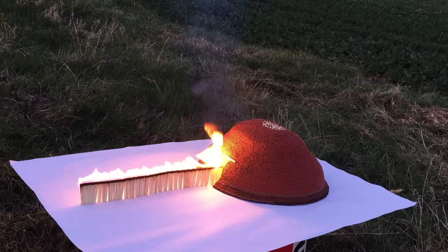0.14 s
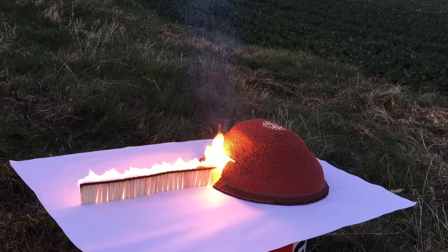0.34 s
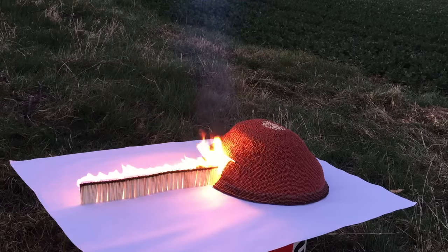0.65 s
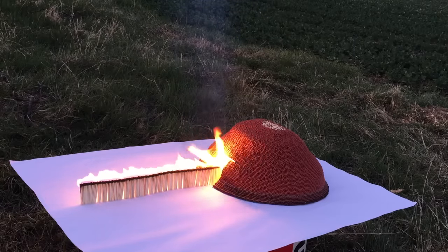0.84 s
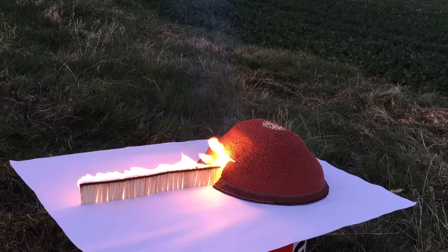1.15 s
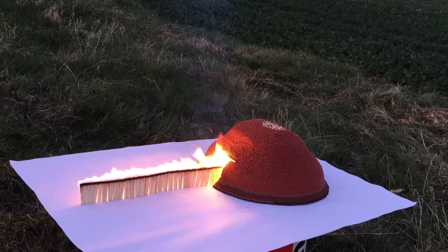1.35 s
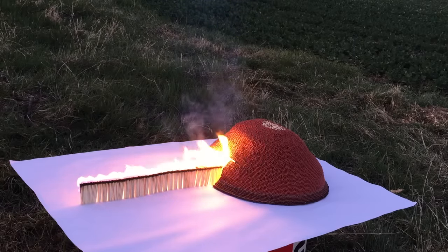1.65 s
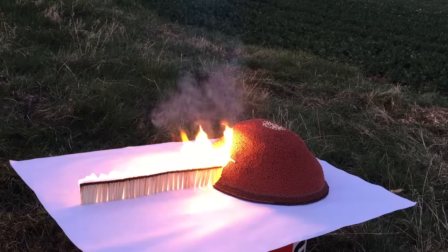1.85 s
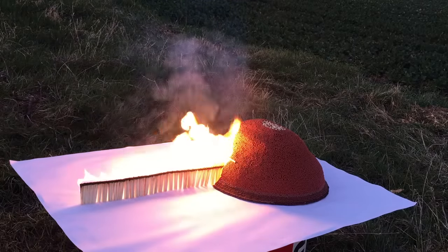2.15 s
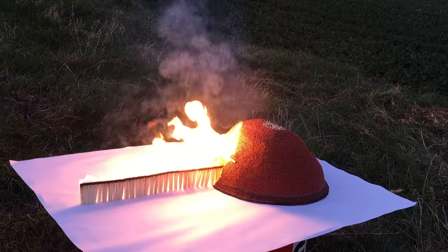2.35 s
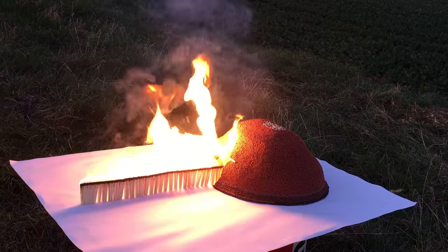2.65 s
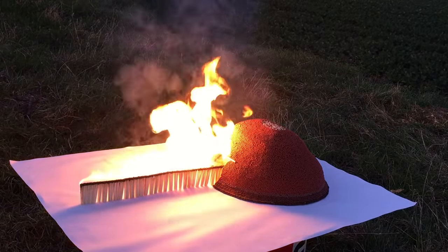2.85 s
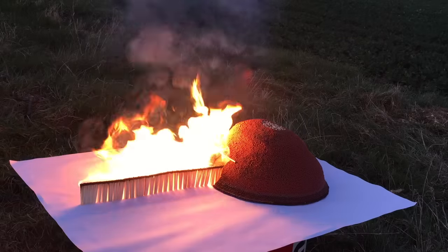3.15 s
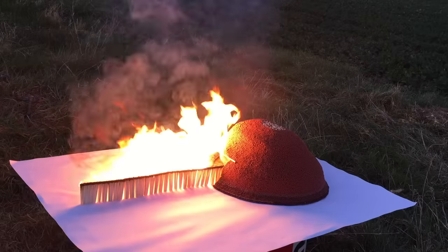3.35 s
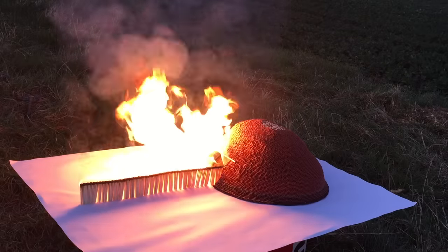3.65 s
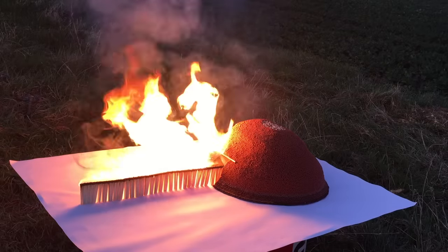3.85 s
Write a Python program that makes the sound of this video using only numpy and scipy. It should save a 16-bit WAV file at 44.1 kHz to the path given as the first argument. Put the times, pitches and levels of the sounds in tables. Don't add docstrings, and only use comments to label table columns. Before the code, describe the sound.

Fire crackles faintly, then flares into a fluttering, hissing roar with sharp pops as matches ignite

```python
import sys
import numpy as np
from scipy import signal
from scipy.fft import rfft, irfft
from scipy.io import wavfile
from scipy.ndimage import uniform_filter1d, map_coordinates

SR = 44100
rng = np.random.default_rng(int(sys.argv[2]) if len(sys.argv) > 2 else 0)


def magnitude_from_level(level_db):
    exponent = np.asarray(level_db, float) / 20
    return 10 ** exponent


def materialize(psi):
    bounded = np.clip(np.atleast_2d(psi).T, -1, 1)
    quanta = np.round(bounded * 32767).astype(np.int16)
    wavfile.write(sys.argv[1], SR, quanta)


N = 176400

# f/Hz, level/dB per Hz
SMALL_FLAME_COLOUR = [(120, -41), (250, -16.5), (650, -6.5), (1950, 1), (3300, -7), (3900, -28),
                      (4800, -40), (7000, -15)]


def unit(x):
    return x / np.sqrt(np.mean(x ** 2) + 1e-20)


def curves(rows):
    s, *cols = np.transpose(rows)
    return [np.interp(np.arange(N) / SR, s, c) for c in cols]


def wobble(rate):
    knots = rng.standard_normal(int(N * 60 / SR) + 9)
    return map_coordinates(knots, [np.arange(N) * min(rate, 60) / SR])


def rush(spectrum, patchy_db):
    z = signal.stft(rng.standard_normal(N), nperseg=512)[2]
    patches = uniform_filter1d(rng.standard_normal(z.shape), size=7, axis=0)
    patches = uniform_filter1d(patches, size=7, axis=1)
    x = signal.istft(z * magnitude_from_level(patchy_db * unit(patches)), nperseg=512)[1][:N]
    f, db = np.transpose([(spectrum[0][0] / 2, -90), *spectrum, (spectrum[-1][0] * 1.3, -90)])
    hz = np.fft.rfftfreq(N, 1 / SR)
    colour = magnitude_from_level(np.interp(np.log(hz + 1), np.log(f + 1), db))
    return unit(irfft(rfft(x) * colour, N))


def add(track, s, piece):
    i = max(round(s * SR), 0)
    track[i:i + len(piece)] += piece[:len(track) - i]


def wavelet(t, hz, cycles, sag=0):
    bend = sag / cycles ** 2 + 1e-3
    turns = (1 - np.exp(-bend * np.clip(hz * t, -4, 9))) / bend
    envelope = np.exp(-(turns / (.6 * cycles)) ** 4 - (hz * t / (1.1 * cycles)) ** 2)
    return envelope * np.cos(2 * np.pi * turns + .2)


def field():
    # f/Hz, level/dB per Hz
    air_colour = [(18, -22), (30, -10), (59, -23), (88, -8), (124, -7), (364, -17.5), (600, -12.5),
                  (913, -18.5), (16000, -47)]
    # t/s, firing f/Hz, level/dB
    engine_drone = [(0, 56.5, -58), (.06, 56.2, -56.5), (.29, 54, -54), (.35, 55, -69), (.44, 56.4, -56),
                    (.52, 56.4, -70), (.62, 54.8, -60), (1.04, 54.8, -57), (1.4, 54.3, -65),
                    (1.55, 53, -69), (2.2, 54.7, -78)]
    t = np.arange(N) / SR
    hz, db = curves(engine_drone)
    throb_db = 2.5 * np.sin(2 * np.pi * 12 * t)
    level = magnitude_from_level(db + 2 * wobble(17) + throb_db) * np.sqrt(2)
    drone = level * np.sin(2 * np.pi * np.cumsum(hz + 3 * wobble(12)) / SR)
    hum_hz = 113.3 + 9 * wobble(14)
    hum = magnitude_from_level(-68 + 4 * wobble(15)) * np.sin(2 * np.pi * np.cumsum(hum_hz) / SR)
    return magnitude_from_level(-60) * rush(air_colour, patchy_db=2.2) + drone + hum


def pops():
    # t/s, peak level/dB, crack f/Hz,
    # length/cycles, thump over the crack/dB
    gas_pockets = [(0.029, -42.5, 1820, 9.3, 7), (0.083, -43, 1480, 6.1, -27), (.640, -40.5, 1620, 1.5, -3),
                   (.663, -37.5, 1610, 1.2, -15), (.7946, -28.5, 2470, 2.16, -27),
                   (1.2936, -32, 1910, 0.94, -7), (1.7588, -30.5, 1696, 1.35, -36),
                   (1.9317, -30.5, 1150, 1.8, -1), (1.981, -29.5, 1730, 1.7, -38),
                   (2.1852, -20.5, 960, 1.03, -10), (2.2763, -28, 1200, 1.6, -7),
                   (2.547, -24.5, 1100, 0.7, -3), (2.7164, -19, 1320, 1.23, -8),
                   (2.7468, -10.5, 1500, 0.87, -17), (2.8888, -8.5, 1420, 1, -28),
                   (2.9806, -22, 1920, 1.2, 11), (3.1048, -3.5, 1070, 1.12, -8.5),
                   (3.1459, -17, 2510, 1.06, -41), (3.4, -24.5, 1400, 0.78, -2),
                   (3.6991, -7.5, 1310, 1.3, -8), (3.7625, -8.5, 1940, 1.36, 1.5),
                   (3.8160, -6, 1740, 0.93, -13), (3.8873, -18.5, 1800, 2.3, 2),
                   (3.9596, -14.5, 1500, 1.4, -14),
                   (0.534, -42, 1700, 1.3, -4), (0.7812, -43.5, 1680, 5.8, -16), (.844, -43, 900, 1.7, 3),
                   (1.286, -36, 1700, 0.66, -8), (1.614, -35.5, 1600, 1.7, -26),
                   (1.9262, -30, 1500, 1.6, 7), (2.296, -36, 810, 1.3, 5), (2.66, -41, 600, 5.5, -6),
                   (2.759, -32.5, 570, 2.3, -1), (3.162, -36, 2300, 1.5, -20),
                   (3.175, -20.5, 2400, 1.7, -24), (3.574, -25, 920, 0.87, -3),
                   (3.879, -26.5, 1500, 3.1, -20), (3.925, -26.5, 520, 2, -25)]
    # t/s, peak level/dB, crack f/Hz, length/cycles
    chained_pockets = [(.058, -42, 1300, 1.2), (.107, -48, 1800, 5), (.7935, -44.5, 720, 3.1),
                       (.806, -45, 2000, 3), (.7925, -36, 2000, 1.8), (1.008, -51.5, 2920, 6),
                       (1.2964, -47, 125, 1.8), (2.197, -34, 1000, 1.7), (2.212, -35, 900, 1.2),
                       (2.777, -27.5, 2000, 1.6), (2.477, -29.5, 1900, 2.2), (2.5, -29, 3000, 3.2),
                       (3.642, -21.5, 1700, 1), (.893, -42, 2700, 1.5), (1.943, -33, 1720, 2),
                       (2.0103, -31.5, 1810, 2.1), (2.1830, -25, 1100, 0.76), (2.1841, -37, 1150, 1.5),
                       (2.2750, -27.5, 1160, 1.5), (2.7146, -20, 1920, 1.4), (2.8904, -12, 2300, 0.85),
                       (2.9794, -11, 2170, 0.9), (2.9821, -31, 1700, 2.9), (3.1066, -17, 600, 0.75),
                       (3.1496, -31, 2500, 1), (3.457, -32, 1000, 0.8), (3.6973, -13, 1500, 0.7),
                       (3.6984, -16, 1910, 1.3), (3.7641, -13.5, 1080, 0.81), (3.815, -24, 1700, 1.3),
                       (3.9585, -11.5, 2920, 1.8), (3.9601, -18, 1700, 0.65)]
    # t/s, peak level/dB
    wood_ticks = [
        (1.2329, -37.5),
        (1.489, -48),
        (3.366, -31),
    ]
    thump_s, thump_slows = 0.00051, 2.41
    thump_fades, thump_dies_s = 0.65, 0.0059
    sputter_db, sputter_s = -15, .0015
    sheet_db, sheet_s = -19, .0032
    top_hz = 4300

    out, ticks, t = np.zeros(N), np.zeros(N), np.arange(-300, 900) / SR
    rags = rush(SMALL_FLAME_COLOUR, patchy_db=0.0)
    chained = [(*pocket, -60) for pocket in chained_pockets]
    for s, db, hz, cycles, thump_db in [*gas_pockets, *chained]:
        grown = 1 + np.clip(t - 0.83 / hz, 0, None) / thump_s
        swing = -np.sin(np.pi * np.log(grown) / np.log(thump_slows))
        thump = swing * grown ** -thump_fades * np.exp(-abs(t) / thump_dies_s)
        snap = magnitude_from_level(-13) * np.clip((db + 14) / 7, 0, 1) * wavelet(t + .2 / hz, 3500, 1.8 * cycles)
        crack = wavelet(t, hz, cycles, sag=1.05) + snap
        crack = crack + magnitude_from_level(sheet_db) * np.roll(crack, round(sheet_s * SR))
        ragged = magnitude_from_level(sputter_db) * np.clip(cycles - 1, .1, 1) * np.exp(-abs(t) / sputter_s)
        rag = ragged * rags[round(s * SR):][:len(t)]
        add(out, s + t[0], magnitude_from_level(db) * (crack + 0.59 * magnitude_from_level(thump_db) * thump + rag))
    for s, db in wood_ticks:
        tick = wavelet(t, 2170, 1.0) + 0.81 * wavelet(t, 7500, 1.3) + .5 * wavelet(t, 13400, 3.3)
        add(ticks, s + t[0], magnitude_from_level(db) * tick)
    dull = np.sqrt(1 + (np.fft.rfftfreq(N, 1 / SR) / top_hz) ** 8)
    return ticks + irfft(rfft(out) / dull, N)


def jets():
    # t/s, level/dB
    jet_strength = [(1.1, -66), (1.74, -61), (1.79, -57.5), (2.19, -50.5), (2.27, -48.5), (3.0, -50),
                    (3.6, -47), (3.95, -48.5)]
    # t/s, swell/dB, half length/s, extra swell of the thin top/dB
    group_surges = [(1.824, 5, 0.025, -2.5), (1.958, 6, .04, -7), (2.106, 3.5, 0.047, -1.5),
                    (2.185, -1.5, 0.025, -6), (2.35, 8, 0.039, -2.5), (2.494, 4, 0.022, -0.5),
                    (2.65, 2, 0.056, 1), (2.747, 5, 0.064, -3), (2.928, 7.5, 0.073, -1),
                    (3.067, -1.5, 0.03, 3.5), (3.223, 5, 0.031, 0.5), (3.387, -1, 0.049, 6.5),
                    (3.632, 4, 0.19, 0), (4.0, 5, 0.036, 2)]
    # end t/s, length/s, level/dB, share of low splutter
    head_flares = [
        (.06, .12, -57, .5),
        (.60, .06, -62, .2),
        (.796, .036, -54, .3),
        (1.015, .03, -65, .3),
        (1.298, .026, -48, .97),
    ]
    many_colour = [(2820, -77), (4800, -2.5), (6660, 2.5), (8700, 0), (10500, 0.5), (11300, 3), (14400, -1),
                   (15700, 0)]
    single_colour = [(4800, -11), (5800, -2.5), (6900, -2.5), (8700, -2.5), (11500, -2.5), (13200, -6),
                     (15800, -8.5)]
    flare_colour = [(5000, -20), (6500, -5.5), (8500, -7), (10200, -3), (11600, 0), (12800, -10),
                    (13600, -16), (15800, -19)]

    level_db, = curves(jet_strength)
    t, gain, low = np.arange(N) / SR, np.zeros(N), np.zeros(N)
    top_db = np.zeros(N)
    for s, swell_db, half, extra_db in group_surges:
        bump = np.exp(-((t - s) / half) ** 2)
        level_db = level_db + swell_db * bump
        top_db = top_db + extra_db * bump
    for end, length, db, share in head_flares:
        rise = np.clip((t - end + length) / (.4 * length), 0, 1)
        shape = magnitude_from_level(db) * rise * np.exp(-np.clip(t - end, 0, None) / (.2 * length))
        gain = gain + np.sqrt(abs(1 - share)) * shape
        low = low + np.sqrt(abs(share)) * shape

    many = np.clip((t - 1.72) / .07, 0, 1)
    hiss = np.sqrt(many) * rush(many_colour, patchy_db=1.57)
    hiss = hiss + np.sqrt(1 - many) * rush(single_colour, patchy_db=2.5)
    top = irfft(rfft(hiss) / (1 + (9800 / (np.fft.rfftfreq(N, 1 / SR) + 1)) ** 8), N)
    hiss = hiss + (magnitude_from_level(top_db) - 1) * top
    steady = magnitude_from_level(level_db + 0.57 * wobble(7.17) + 1.1 * wobble(30.09)) * hiss
    flare = gain * rush(flare_colour, patchy_db=2)
    splutter = low * magnitude_from_level(3 * wobble(55)) * rush(SMALL_FLAME_COLOUR, patchy_db=2.5)
    return steady + flare + splutter


def crackle(count):
    draw, t = rng.random((count, 4)), np.arange(-80, 80) / SR
    hz = 1500 * np.exp(1.61 * (draw[:, 1:2] - .6))
    size = magnitude_from_level(-4.5 * np.log(draw[:, 2:3] + .03))
    at = (draw[:, :1] * (N - len(t))).astype(int) + np.arange(len(t))
    grains = size * wavelet(t, hz, 1 + 0.5 * draw[:, 3:])
    return np.bincount(at.ravel(), grains.ravel(), N)


def flame():
    # t/s, size level/dB, bright edge level/dB
    fire_growth = [(0.0, -60.5, -2), (0.15, -64.5, -16), (1.16, -61.5, -16), (1.69, -55.5, -18),
                   (1.93, -46, -18), (2.1, -44.5, -18), (2.22, -45.5, -19), (2.35, -41.5, -16),
                   (2.5, -42, -15.5), (2.82, -41, -15.5), (3.07, -41, -13.5), (3.14, -37, -8),
                   (3.31, -38.5, -13), (3.37, -36.5, -10), (3.6, -32, -8), (3.78, -33.5, -10),
                   (4.0, -33.5, -13)]
    # f/Hz, level/dB per Hz
    big_colour = [(250, -17), (650, -7.5), (950, -8), (1500, 0), (3400, 0), (4400, -6.5), (5100, -14),
                  (8000, -23)]
    # f/Hz, level/dB per Hz
    flutter_colour = [(18, -40), (30, -15), (75, -1.5), (143, -3), (268, -21), (400, -11.5), (520, -48),
                      (880, -120)]
    full_db = -33
    dull_db, bright_db = -18.5, -7

    size_db, edge_db = curves(fire_growth)
    big = np.clip((edge_db - dull_db) / (bright_db - dull_db), 0, 1)
    roar = np.sqrt(1 - big) * rush(SMALL_FLAME_COLOUR, patchy_db=1.5)
    roar = roar + np.sqrt(big) * rush(big_colour, patchy_db=1.1)
    flicker_db = .5 * wobble(8) + 1.0 * wobble(30)
    roar = magnitude_from_level(size_db + flicker_db) * (roar + magnitude_from_level(-7.5) * crackle(count=420))
    lumps = unit(magnitude_from_level(3.5 * wobble(16)) * rush(flutter_colour, patchy_db=1.5))
    flutter_db = full_db - 8.5 + 1.54 * (size_db - full_db)
    return roar + magnitude_from_level(flutter_db) * lumps


def scene():
    return (field() + pops() + jets() + flame())[None]


def roll_off(x):
    return signal.sosfilt(signal.butter(12, 16330, fs=SR, output="sos"), x)


def record(dry):
    hz = np.fft.rfftfreq(N, 1 / SR)
    gain = (hz < 15850) / np.sqrt(1 + (48 / (hz + 1)) ** 8)
    return roll_off(irfft(rfft(dry) * gain, N))


dry = scene()
out = record(dry)
materialize(out)
```